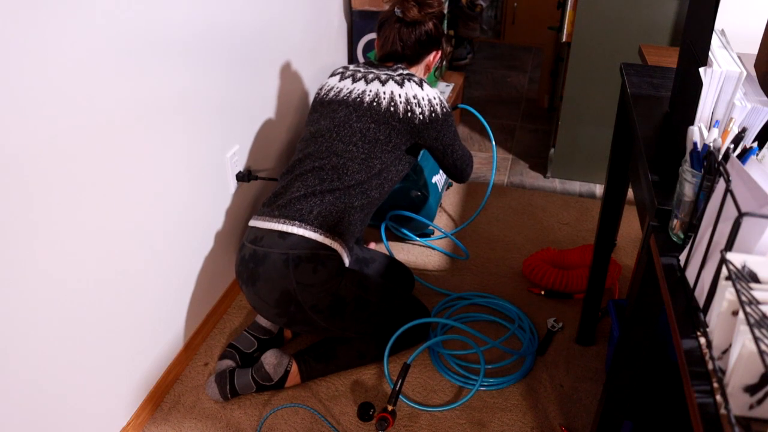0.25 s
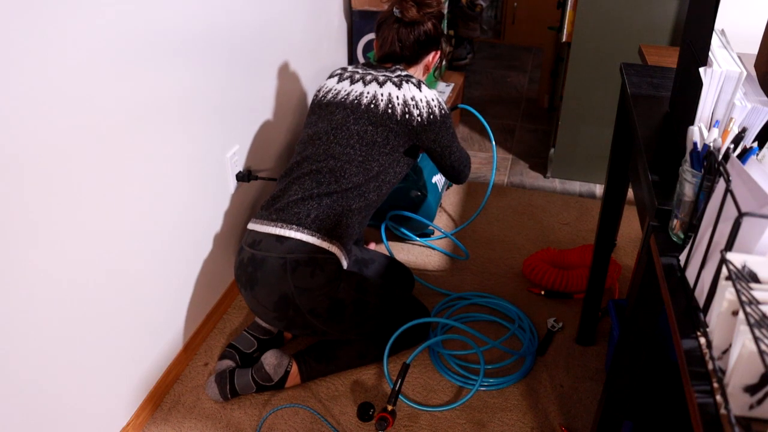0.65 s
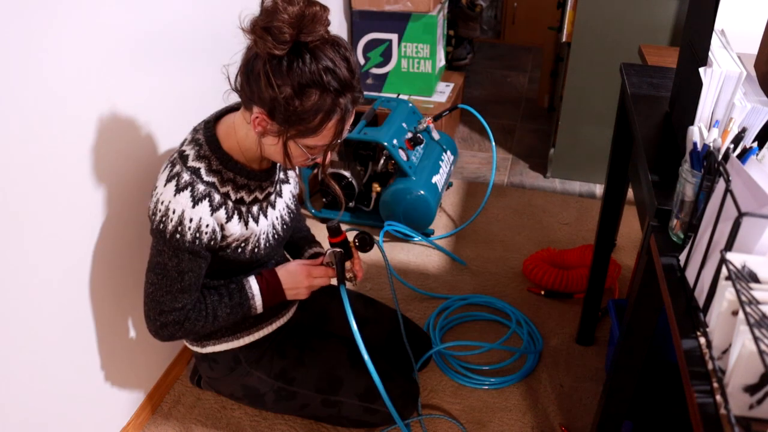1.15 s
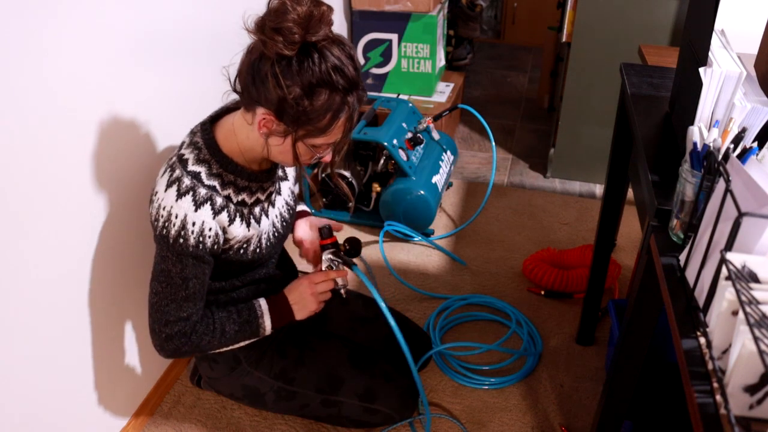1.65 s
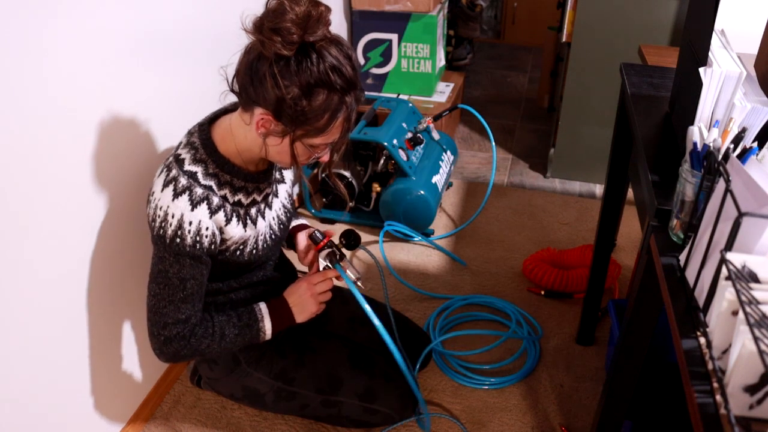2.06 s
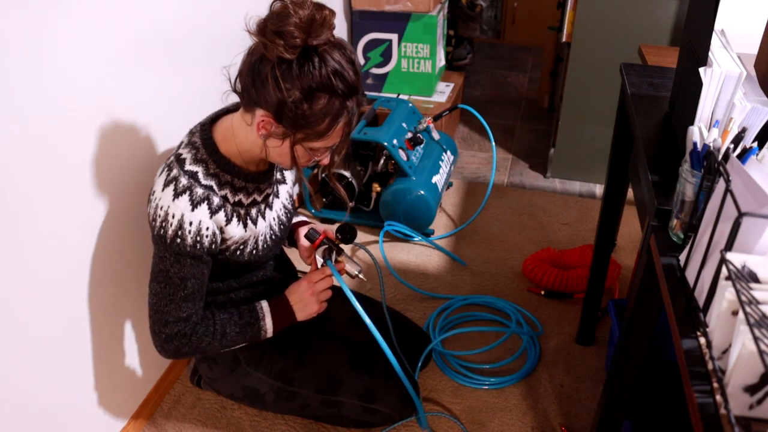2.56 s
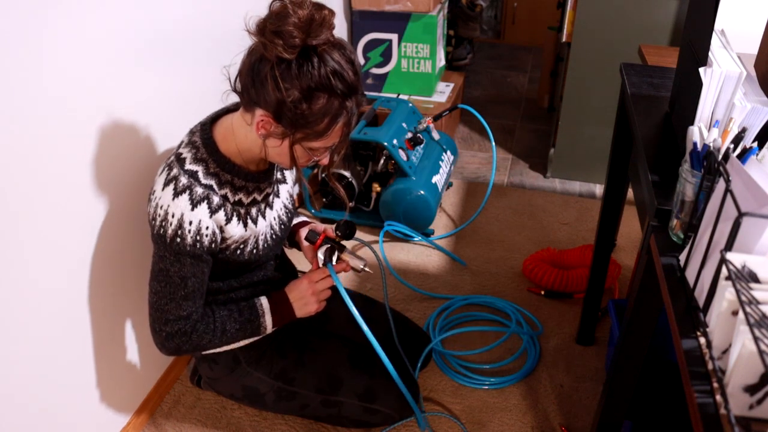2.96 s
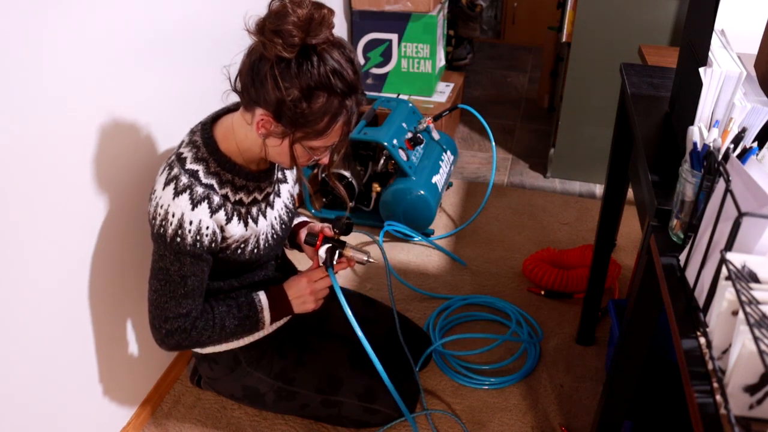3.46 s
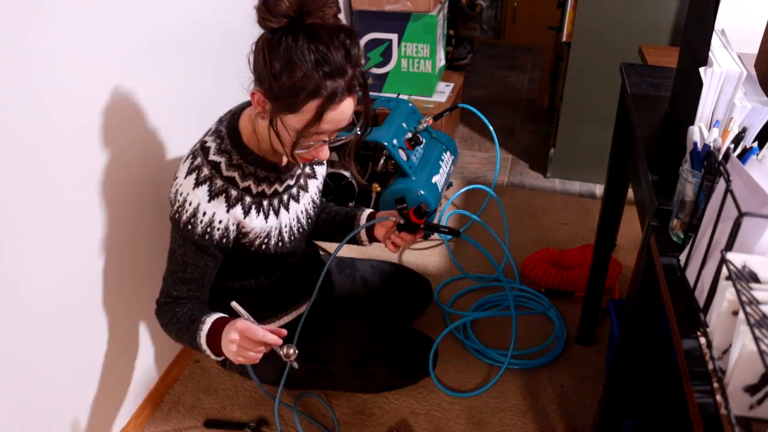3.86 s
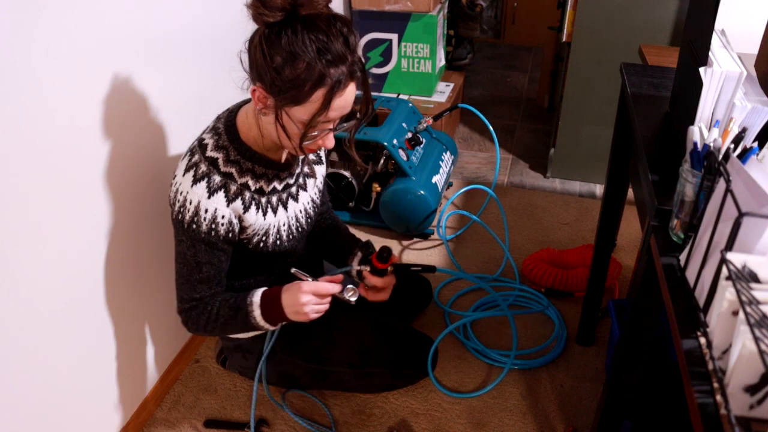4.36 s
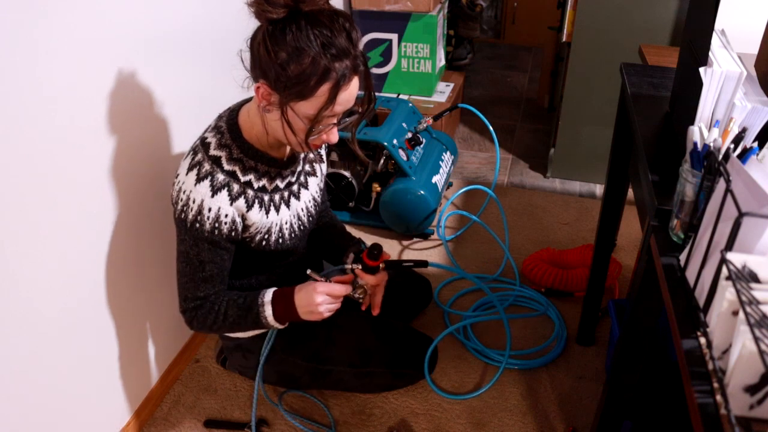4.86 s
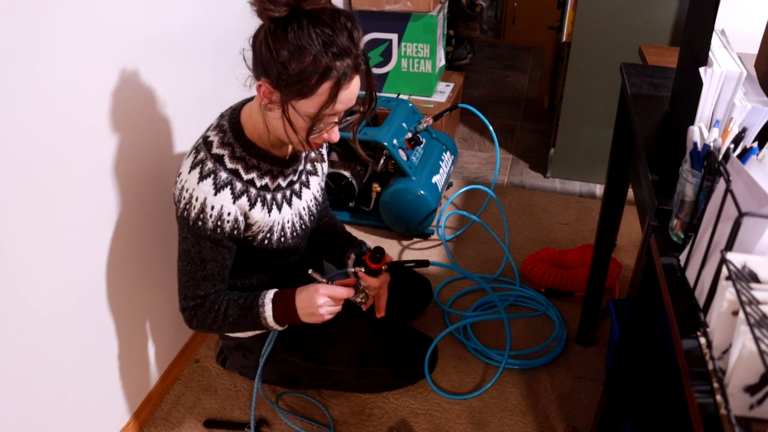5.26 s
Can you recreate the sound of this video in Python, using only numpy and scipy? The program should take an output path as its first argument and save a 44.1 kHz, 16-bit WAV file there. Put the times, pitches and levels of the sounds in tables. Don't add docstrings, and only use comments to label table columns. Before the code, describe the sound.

Compressed air whistles faintly, both mid-pitched and high, over a broad rush, sagging and recovering. After a sudden cut come light metal touches, a sharp snap with knocks and short ringing, then quiet and one tiny tick. Finally a bright constant leak begins, and a trigger releases a strong jet, dark at first and then fizzy, ending quickly while the leak continues. Close stereo pickup, small lively room, low background noise.

```python
import sys
import numpy as np
from scipy import signal
from scipy.fft import rfft, irfft, next_fast_len
from scipy.io import wavfile
from scipy.ndimage import uniform_filter1d, map_coordinates

SR = 44100
rng = np.random.default_rng(int(sys.argv[2]) if len(sys.argv) > 2 else 0)


def amplitude_ratio(level_db):
    exponent = np.asarray(level_db, float) / 20
    return 10 ** exponent


def wrap_up_sound(samples):
    columns = np.atleast_2d(samples).T
    tamed = np.clip(columns, -1, 1)
    steps = np.round(tamed * 32767).astype(np.int16)
    wavfile.write(sys.argv[1], SR, steps)


N = 243343


def unit(x):
    return x / np.sqrt(np.mean(x ** 2) + 1e-20)


def along(points, hz):
    f, v = np.transpose(points)
    return np.interp(np.log(hz + 1), np.log(f + 1), v)


def filtered(x, response):
    m = next_fast_len(x.shape[-1] + 8192)
    spectrum = rfft(x, m) * response(np.fft.rfftfreq(m, 1 / SR))
    return irfft(spectrum, m)[..., :x.shape[-1]]


def shape(points):
    return lambda hz: amplitude_ratio(along(points, hz))


def resonance(f, centre, width):
    return 1j * f * width / (centre ** 2 - f * f + 1j * f * width)


def modes(table):
    return lambda f: np.sqrt(sum(np.abs(amplitude_ratio(db) * resonance(f, c, w)) ** 2 for c, w, db in table))


def curves(rows, late_s=0):
    s, *cols = np.transpose(rows)
    onset = late_s * (s < s[0] + .05)
    return [np.interp(np.arange(N) / SR, s + onset, c, left=-120) for c in cols]


def bumps(rows):
    return sum(db * np.exp(-((np.arange(N) / SR - s) / half) ** 2) for s, db, half in rows)


def turbulence(response, patchy_db, flutter_db):
    z = signal.stft(rng.standard_normal(N), nperseg=512)[2]
    field = uniform_filter1d(rng.standard_normal(z.shape), size=7, axis=0)
    field = uniform_filter1d(field, size=12, axis=1)
    x = signal.istft(z * amplitude_ratio(patchy_db * unit(field)), nperseg=512)[1][:N]
    eddies = map_coordinates(rng.standard_normal(N // 300 + 4), [np.arange(N) / 300])
    return unit(filtered(x * amplitude_ratio(flutter_db * eddies), response))


def floor():
    # f/Hz, level/dB (per Hz)
    floor_colour = [(12, -38), (20, -7), (88, -4.5), (248, -9.5), (277, -13), (319, -11.5), (347, -15),
                    (472, -14), (718, -14), (780, -15.5), (1030, -16), (1530, -17.5), (16000, -38.5)]
    # f/Hz, likeness (0-1)
    alike = [(60, 0.23), (240, 0.33), (950, 0.61), (3770, 0.64), (15000, 0.57)]
    level_db = -54.5

    def mid_and_side(hz):
        turn = np.arccos(np.clip(along(alike, hz), -1, 1)) / 2
        return shape(floor_colour)(hz) * np.array([np.ones_like(hz), np.tan(turn)])

    mid, side = filtered(rng.standard_normal((2, N)), mid_and_side)
    return amplitude_ratio(level_db) * np.array([mid + side, mid - side]) / np.std(mid)


def fitting():
    # t/s, level/dB
    air_flow = [
        (0.06, -67),
        (0.09, -42.5),
        (0.128, -38),
        (0.294, -39.5),
        (0.436, -46),
        (0.634, -41.5),
        (0.784, -47),
        (0.966, -39.5),
        (0.99, -38.5),
    ]
    # f/Hz, width/Hz, level/dB
    bore_modes = [(2390, 190, -8), (2614, 39, 0), (2750, 200, -5.5), (3220, 140, -14)]
    # f/Hz, width/Hz, level/dB
    gap_modes = [(6830, 270, -2), (7050, 230, 0), (7100, 240, -5), (13800, 600, -22)]
    # f/Hz, level/dB (per Hz)
    rush_colour = [(300, -14), (900, -3), (1300, 0), (2000, -2), (4000, 0), (6000, -2), (8300, -2.5),
                   (9200, -29), (13000, -13), (16000, -36)]
    # f/Hz, width/Hz, level/dB
    hose_modes = [(963, 25, 6), (1260, 47, 6.5), (1640, 92, 3.5), (3930, 110, -4), (4500, 170, -6),
                  (8400, 460, -8)]
    # level/dB at full flow, growth/(dB per dB of flow), delay/s needed to speak
    parts = [
        (-40, 0.9, 0.024),
        (-39, .7, .001),
        (-49, 0.8, 0.0055),
    ]
    full_flow_db = -40
    gains = []
    for db, grows, late_s in parts:
        flow_db = curves(air_flow, late_s)[0]
        gains.append(amplitude_ratio(db + grows * (flow_db - full_flow_db)))
    low, high, broad = gains
    bore = turbulence(lambda f: modes(bore_modes)(f) ** 1.3, patchy_db=0.3, flutter_db=1)
    gap = turbulence(lambda f: modes(gap_modes)(f) ** 1.43, patchy_db=2.0, flutter_db=-0.2)
    rush = turbulence(lambda f: shape(rush_colour)(f) * (1 + 1.2 * modes(hose_modes)(f)),
                      patchy_db=0.5, flutter_db=0.8)
    return low * bore + high * gap + amplitude_ratio(6) * broad * rush


def coupler():
    # t/s, level/dB, ring f/Hz, t60/s
    pings = [(1.346, -47, 7200, .013), (1.391, -34.5, 1015, 0.016), (1.42, -33.5, 1635, 0.056),
             (1.422, -49.5, 3760, .12), (1.868, -46, 3300, .025), (1.9555, -21, 2400, 0.0054),
             (1.959, -30, 4500, 0.024), (1.961, -37, 3780, 0.25), (1.986, -32.5, 1934, 0.058),
             (1.985, -38, 6740, .012), (1.985, -38.5, 7640, 0.014), (2.0489, -30.5, 1650, 0.02),
             (2.057, -31.5, 1690, 0.021), (2.0708, -40, 1630, .017), (2.149, -46, 7400, 0.0095),
             (2.0345, -36, 4600, .02), (2.052, -43, 4290, .05), (2.156, -50, 3500, .05),
             (3.326, -47, 4770, .008)]
    # t/s, level/dB, t60/s
    rattles = [
        (1.347, -44, .013),
        (1.396, -46, .11),
        (1.44, -43.5, .086),
        (1.9556, -24, .008),
        (1.958, -28, 0.066),
        (1.983, -28.5, 0.069),
        (2.0338, -31, 0.021),
        (2.053, -42.5, 0.43),
        (2.149, -44, .01),
        (2.154, -44, 0.12),
    ]
    # f/Hz, width/Hz, level/dB
    sleeve_modes = [(1070, 780, 2.5), (1650, 230, 5), (2270, 340, -6), (3280, 450, -6), (3780, 48, 5),
                    (4600, 100, -16)]
    rattle_db = -6
    rise_share, slowest_rise_s = 0.062, 0.0045
    out, t = np.zeros(N + SR), np.arange(SR // 4) / SR
    radiated = signal.butter(4, [640, 5000], "band", fs=SR, output="sos")
    for s, db, hz, t60 in pings + [(s, db, 0, t60) for s, db, t60 in rattles]:
        rise = min(rise_share * t60, slowest_rise_s)
        blow = amplitude_ratio(-60 * t / t60) * (1 - np.exp(-t / rise))
        strength_db = rng.normal(0, 2, len(sleeve_modes))

        def sleeve(f):
            return 1.0 + sum(amplitude_ratio(d + extra) * resonance(f, c, w)
                             for extra, (c, w, d) in zip(strength_db, sleeve_modes))

        rattle = signal.sosfilt(radiated, filtered(blow * rng.standard_normal(len(t)), sleeve))
        body = blow * np.sin(2 * np.pi * hz * t) + amplitude_ratio(rattle_db) * rattle
        out[round(s * SR):][:len(t)] += amplitude_ratio(db) * body / np.abs(body).max()
    return out[:N]


def jet_gains():
    # t/s, air flow level/dB, valve opening (0-1)
    trigger = [
        (4.505, -46, 0.14),
        (4.535, -35, 0.04),
        (4.59, -29.5, 0),
        (4.654, -24, 0.55),
        (4.806, -25, .95),
        (4.94, -24, 0.78),
        (5.1, -24.5, 0.7),
        (5.3, -24, 0.63),
        (5.448, -34, 0.07),
    ]
    # t/s, loss/dB, half length/s
    falters = [
        (4.602, 5, 0.011),
        (5.044, 2.5, 0.016),
    ]
    # t/s, level/dB, half length/s
    cupping = [
        (4.93, -2, 0.036),
        (5.005, 2, .03),
        (5.11, -3, .045),
    ]
    # level/dB over the flow, gain/dB from a fully open valve
    parts = [
        (4, -11.5),
        (-0.6, -0.4),
        (-3.5, 5.5),
        (-13.5, 18),
    ]
    shut_db_per_s = 180
    flow_db, opening = curves(trigger)
    after_s = np.maximum(np.arange(N) / SR - trigger[-1][0], 0)
    flow_db = flow_db - bumps(falters) - shut_db_per_s * after_s
    cup = [0, 1, -1, 0]
    return [amplitude_ratio(flow_db + db + gain_db * np.clip(opening, 0, 1) + c * bumps(cupping))
            for (db, gain_db), c in zip(parts, cup)]


def spray_tool():
    # f/Hz, level/dB (per Hz)
    seep = [(240, -44), (400, -26), (578, -22), (975, -9.5), (1430, -7), (1640, -5), (2450, -5),
            (2730, -4.5), (4060, -2.5), (5360, 0.5), (7170, 0.5), (10700, -9.5), (15700, -18.5)]
    # f/Hz, width/Hz, level/dB
    palm = [(558, 92, -11), (836, 214, -6), (1317, 570, -1)]
    # f/Hz, width/Hz, level/dB
    hollow = [(1650, 490, -3.5), (2140, 450, -1.5), (2620, 630, -1.5)]
    # f/Hz, level/dB (per Hz)
    shear = [(1800, -27.5), (2900, 0), (3800, 2), (4700, 1.5), (5500, -5.5), (7000, -33)]
    # f/Hz, level/dB (per Hz)
    fizz = [(4000, -32), (5200, 1.5), (6000, 2), (7400, -2), (8500, -8), (11000, -17.5), (16000, -28)]
    # f/Hz, width/Hz, level/dB
    nozzle = [(1276, 40, -2.5), (1426, 29, -0.5), (1635, 26, 1.5), (1780, 22, 5), (2056, 35, 5),
              (2290, 23, -0.5), (2730, 35, 0.5), (3680, 55, -3.5), (3870, 32, 0), (4060, 25, -7),
              (4570, 37, -2)]
    leak_start_s, leak_db, surge_db, settle_s = 3.77, -33, 3, 0.36
    since = np.arange(N) / SR - leak_start_s
    leak_gain = (since > 0) * amplitude_ratio(leak_db + surge_db * np.exp(-np.abs(since) / settle_s) + 1)
    leak = leak_gain * turbulence(shape(seep), patchy_db=0.1, flutter_db=1.0)
    colours = [lambda f: modes(palm)(f) ** 1.55, lambda f: modes(hollow)(f) ** 1.34, shape(shear), shape(fizz)]
    jet = sum(gain * turbulence(colour, patchy_db=1.1, flutter_db=1.3)
              for gain, colour in zip(jet_gains(), colours))
    return leak + filtered(jet, lambda f: 0.87 + 0.81 * modes(nozzle)(f))


def echo():
    # f/Hz, t60/s
    ring_time = [(300, 0.46), (2000, 0.21), (8000, 0.26), (16000, 0.3)]
    # f/Hz, level/dB
    wet = [(300, -6), (700, -1.5), (1400, -7.5), (3000, -1.5), (5500, -4), (9000, 0.5), (12000, 2.5),
           (16000, 4)]
    hz, t, z = signal.stft(rng.standard_normal((2, SR // 3)), SR, nperseg=256)
    decay = amplitude_ratio(-60 * t / along(ring_time, hz)[:, None])
    tail = signal.istft(z * decay, SR, nperseg=256)[1]
    tail = filtered(tail, lambda f: amplitude_ratio(along(wet, f)) / np.sqrt(along(ring_time, f)))
    return np.pad(tail / np.linalg.norm(tail[0]), ((0, 0), (130, 0)))


def heard(x):
    # f/Hz, phase/rad
    lead = [(300, 0), (3100, .35), (4300, .85), (5500, .8), (6200, 1.5), (7400, 1.6), (9200, 2.6),
            (11500, 2.5), (12900, 3.3), (14300, 3.9), (16000, 4.3)]
    # f/Hz, left minus right level/dB
    tilt = [(500, 1), (5500, 0.4), (6100, 0), (6800, 4), (8000, -6.5), (9200, 7.5), (11000, -6), (12500, 6),
            (16000, -14)]
    # f/Hz, share (0-1)
    still = [(300, .97), (5000, .92), (8000, .45), (16000, .3)]
    walls, step = np.zeros((2, N + SR)), SR // 5
    moving = filtered(x, lambda f: np.sqrt(1 - along(still, f) ** 2))
    padded = np.pad(moving, (step, 2 * step))
    fade = np.sin(np.pi * np.arange(2 * step) / (2 * step))
    for start in range(-step, N, step):
        piece = padded[start + step:][:2 * step] * fade
        if np.abs(piece).max() > 1e-4:
            answer = signal.fftconvolve(piece[None], echo(), axes=1)[:, max(-start, 0):]
            walls[:, max(start, 0):][:, :answer.shape[1]] += answer
    steady = filtered(x, lambda f: along(still, f))
    walls = walls[:, :N] + signal.fftconvolve(steady[None], echo(), axes=1)[:, :N]

    def ports(f):
        half = amplitude_ratio(along(tilt, f) / 2) * np.exp(.5j * along(lead, f))
        return np.array([half, 1 / half])

    return filtered(x, ports) + amplitude_ratio(-1.5) * walls


def scene():
    # t/s, fade/s
    changes = [
        (1.0, .012),
        (3.7702, .008),
    ]
    t = np.arange(N) / SR
    before = t < changes[0][0]
    sources = heard(fitting() * before) * before + heard(coupler() + spray_tool())
    dips = np.prod([np.clip(np.abs(t - s) / fade, 0, 1) for s, fade in changes], axis=0)
    return (amplitude_ratio(-0.5) * sources + floor()) * dips


def roll_off(x):
    return signal.sosfilt(signal.butter(12, 16650, fs=SR, output="sos"), x)


def record(dry):
    mix = filtered(dry, lambda hz: hz < 15700)
    return roll_off(mix)


dry = scene()
out = record(dry)
wrap_up_sound(out)
```